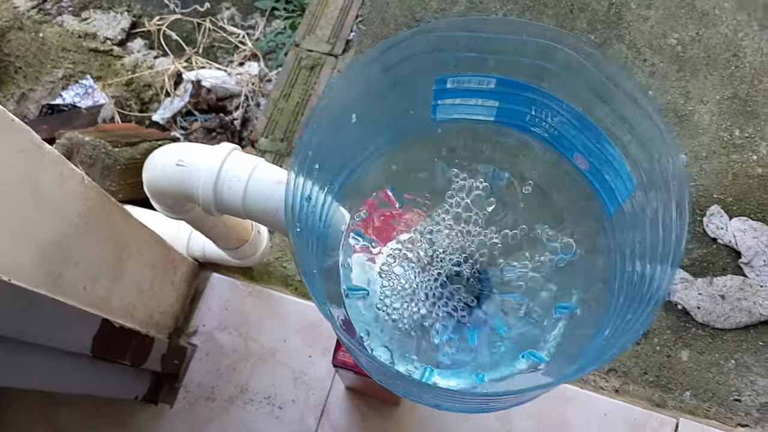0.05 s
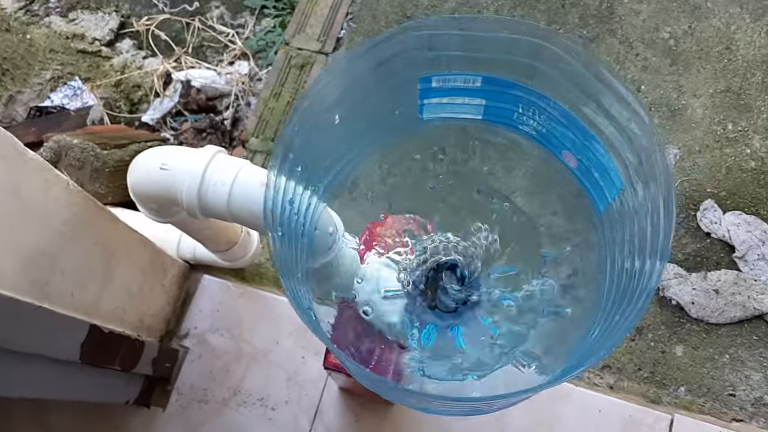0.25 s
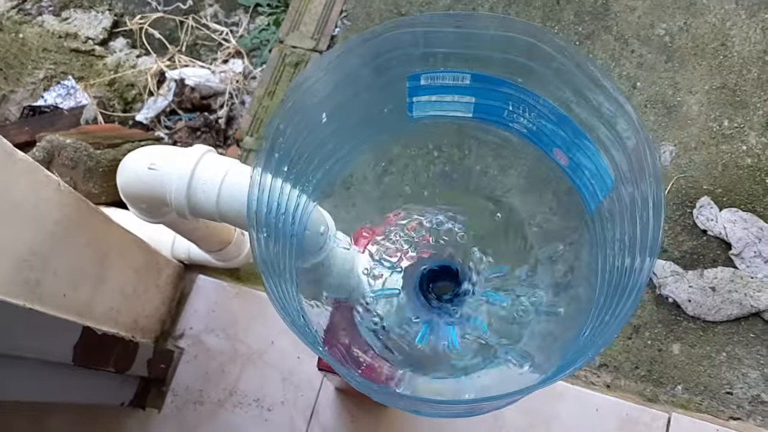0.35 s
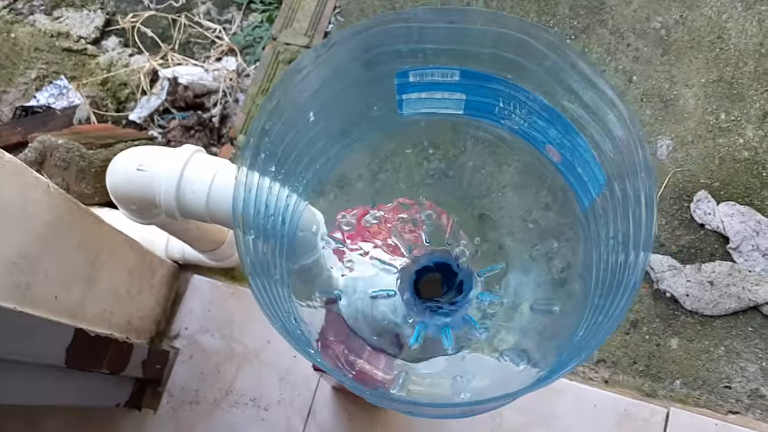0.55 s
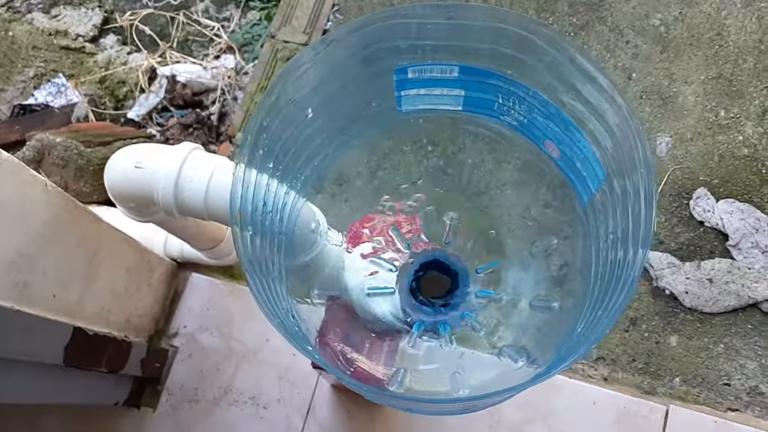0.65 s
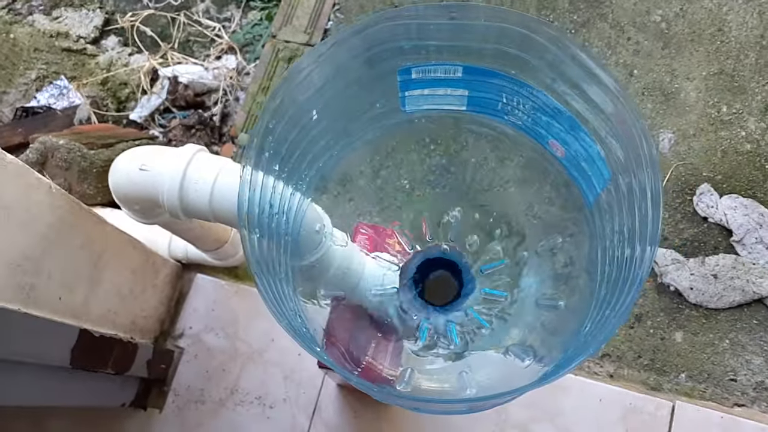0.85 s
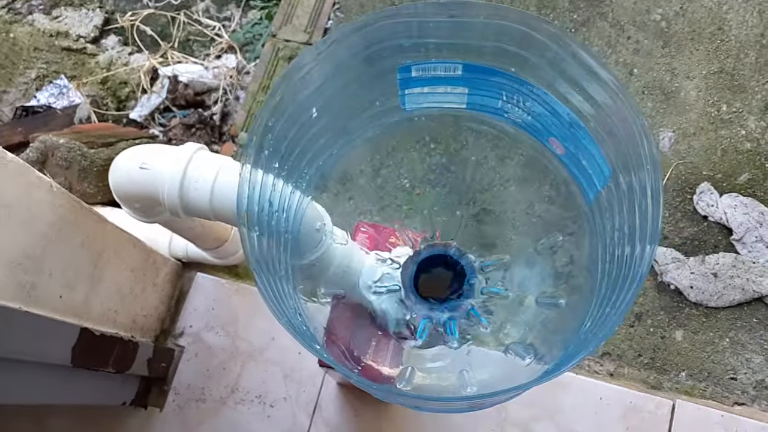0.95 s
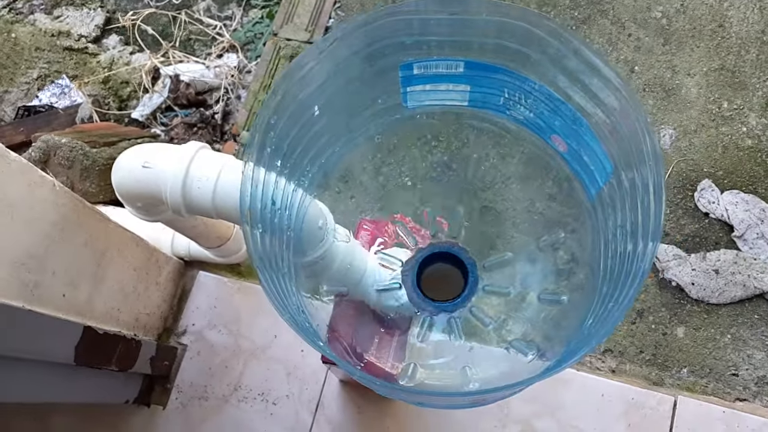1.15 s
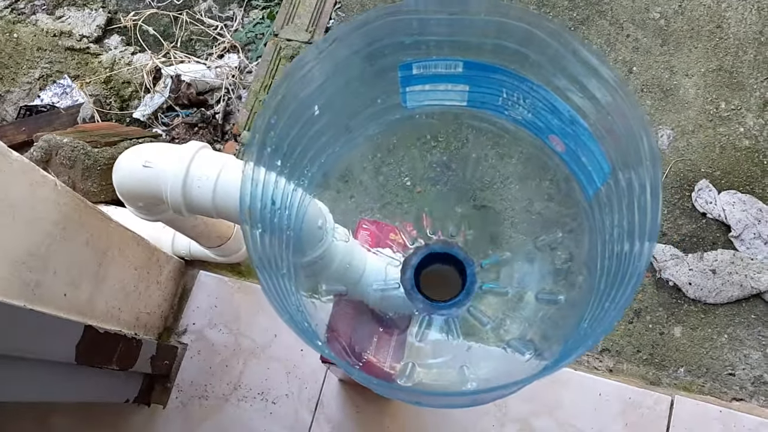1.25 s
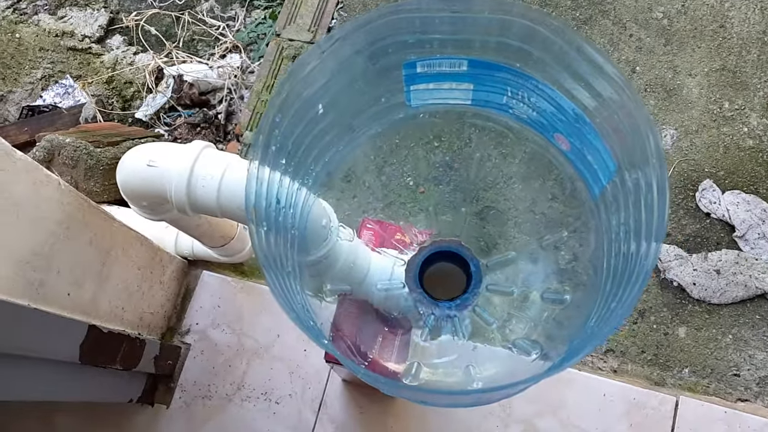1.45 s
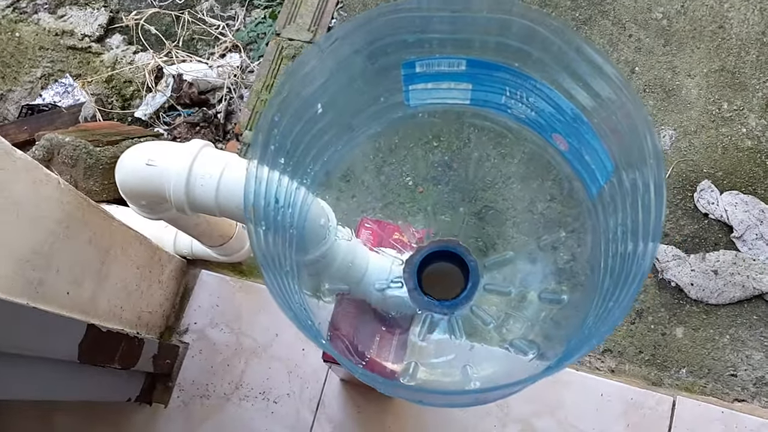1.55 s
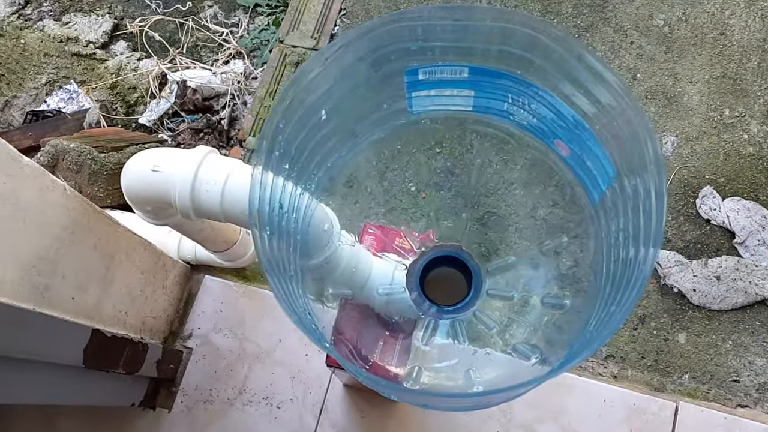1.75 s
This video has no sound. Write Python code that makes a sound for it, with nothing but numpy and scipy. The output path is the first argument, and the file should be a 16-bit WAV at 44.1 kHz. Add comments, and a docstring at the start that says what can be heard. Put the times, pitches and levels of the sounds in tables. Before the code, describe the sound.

Water drains from a plastic bowl into a pipe, close by, starting at about 0.2 seconds with a rising, sputtering slurp. From 0.3 seconds, quick hollow gulps and gurgles follow, mixed with fizzing bubbles and droplet ticks, strongest around 0.9 to 1.1 seconds. A last burst comes at 1.5 seconds, and the empty pipe rings briefly, fading into quiet outdoor air.

```python
"""Outdoors, at a drain pipe: the last water in a plastic bowl swirls down.
The vortex breaks through with a rising slurp. Gulps of air boom in the pipe's throat over a
brief hollow tone, while films burst in the neck and spray, bubbles and droplets fizz at the rim.
After the last plug of water bursts, the emptied pipe rings briefly over quiet outdoor air."""
import sys
import numpy as np
from scipy import signal
from scipy.fft import rfft, irfft
from scipy.io import wavfile
from scipy.ndimage import map_coordinates

SR = 44100
rng = np.random.default_rng(int(sys.argv[2]) if len(sys.argv) > 2 else 0)


def wrap_up_sound(samples):
    """Save the sound to the file named by the first command line argument, as 16-bit audio."""
    columns = np.atleast_2d(samples).T
    # keep every value between -1 and 1, then stretch to whole-number steps
    tamed = np.clip(columns, -1, 1)
    steps = np.round(tamed * 32767).astype(np.int16)
    wavfile.write(sys.argv[1], SR, steps)


N = 79380
TIME = np.arange(N) / SR

# air pockets in the throat: start_s, peak_db, pitch_hz, decay_s
AIR_POCKETS = [(.273, -10, 326, 0.005), (.291, -11.5, 302, 0.016), (.305, -11.5, 324, 0.0055),
               (.319, -14, 315, .0079), (.340, -17, 293, 0.0097), (.360, -13, 313.5, 0.015),
               (.407, -11.5, 221, 0.0062), (.469, -11, 299, 0.0074), (.493, -10.5, 264, 0.0034),
               (.526, -13, 302, 0.0067), (.626, -17.5, 245, 0.0037), (.653, -9.5, 240, 0.0084),
               (.668, -11.5, 314.7, 0.014), (.684, -10, 282.4, 0.011), (.700, -9, 294.4, 0.0068),
               (.728, -9.5, 319.5, 0.0091), (.762, -16, 341, 0.011), (.781, -13.5, 309, 0.014),
               (.804, -12.5, 295, 0.012), (.840, -16.5, 295, 0.0027), (.876, -11.5, 336, 0.0055),
               (.899, -7.5, 303, 0.0083), (.913, -5.5, 287, 0.0072), (.961, -9.5, 284, 0.0038),
               (.999, -13.5, 308, .009), (1.017, -11.5, 324.4, 0.011), (1.055, -5.5, 320.3, 0.013),
               (1.062, -7.5, 334, .009), (1.087, -15, 239, 0.01), (1.186, -11.5, 317, 0.0051),
               (1.201, -16, 342, .012), (1.214, -12.5, 316, 0.0055), (1.273, -16.5, 333, 0.0097),
               (1.286, -14.5, 335, 0.0077), (1.319, -14, 292.6, 0.0085), (1.481, -16.5, 302, 0.0066),
               (1.512, -8.5, 300, 0.0057)]
# films bursting in the neck: start_s, length_s, level_db, centre_hz, width_hz
FILM_BURSTS = [(.185, .022, -31, 1270, 500), (.211, .0035, -18.5, 1740, 1610),
               (.2167, .0051, -12, 2150, 1000), (.232, .01, -20.5, 990, 220),
               (.323, .012, -20.5, 3000, 1770), (.650, .008, -25, 1700, 5100),
               (.729, .009, -23.5, 850, 196), (.766, .008, -24.5, 950, 1100),
               (.804, .006, -30.5, 2500, 2000), (.892, .018, -21.5, 650, 400),
               (.899, .017, -15.5, 1110, 190), (1.015, .014, -23.5, 1010, 900),
               (1.044, .014, -18.5, 2120, 500), (1.052, .015, -20, 1620, 300), (1.056, .025, -22, 830, 400),
               (1.059, .01, -19, 2700, 275), (1.113, .011, -28.5, 2600, 900),
               (1.185, .036, -25.5, 800, 800), (1.210, .022, -22.5, 1600, 1300),
               (1.284, .0048, -18, 950, 298), (1.286, .0065, -23, 1800, 1200), (1.479, .01, -24, 630, 248),
               (1.493, .012, -20.5, 623, 159), (1.494, .017, -22.5, 1970, 1330),
               (1.511, .0034, -16, 790, 1390), (1.52, .0035, -15, 1470, 1570)]
# hollow neck: centre_hz, width_hz, gain_db
NECK_MODES = [(721, 45, 7), (931, 50, 6), (1660, 60, 4), (2800, 110, 7)]
# vortex suction: time_s, level_db, resonance_hz
SLURP_CURVE = [(.18, -58, 1300), (.205, -35, 1610), (.225, -27, 1810), (.27, -21.5, 1870),
               (.305, -21.5, 2130), (.335, -24, 2210), (.385, -38.5, 2230), (.56, -40.5, 2340),
               (.69, -36, 2220), (.84, -41.5, 2180), (1.05, -66, 2220)]
# vortex core: resonance_ratio, width_hz, gain_db
CORE_MODES = [(1.002, 167, 3.5), (1.48, 438, -7.5), (2.15, 690, -12)]
# water over the rim: time_s, spray_db, bubbling_db
RIM_FLOW = [(.185, -56.5, -62.5), (.224, -34.5, -35), (.33, -37.5, -33.5), (.42, -41.5, -37),
            (.56, -44.5, -37), (.66, -38.5, -33), (.80, -41.5, -38), (.90, -42.5, -33.5), (.985, -40, -39),
            (1.06, -42.5, -32.5), (1.14, -41.5, -37.5), (1.215, -39, -37), (1.27, -43.5, -36.5),
            (1.42, -46, -51.5), (1.465, -42.5, -40), (1.502, -32.5, -31), (1.545, -42, -34.5),
            (1.61, -54.5, -44.5), (1.8, -63.5, -58)]
# spray, bubbling and throat turbulence: freq_hz, gain_db
SPRAY_SPECTRUM = [(1500, -19), (2800, -5), (3800, -6), (5000, -1), (6600, 0), (7500, -10), (9500, -4.5),
                  (12000, -12), (16000, -20)]
BUBBLING_SPECTRUM = [(400, -12), (600, 0), (950, -2), (1200, -2.5), (1600, -2), (2750, 1.5), (3500, -14),
                     (7000, -39)]
CHURN_SPECTRUM = [(25, -51), (90, -13.5), (160, -7), (220, 1), (340, 5.5), (410, -5.5), (560, -17.5),
                  (1200, -39)]
# bubble clusters at the rim: start_s, peak_db, pitch_hz
BUBBLE_CLUSTERS = [(.196, -19, 1500), (.239, -18.5, 5050), (.272, -12.5, 3380), (.305, -11.5, 2880),
                   (.344, -14.5, 4500), (.358, -18.5, 4100), (.406, -18, 2280), (.447, -24, 2920),
                   (.4615, -14, 3130), (.742, -24, 5200), (.876, -23, 2900), (1.017, -23, 3600),
                   (1.113, -23.5, 6350), (1.182, -26, 6500)]
# droplets on plastic: start_s, peak_db
DROPLETS = [(.199, -31), (.2185, -21), (.253, -21), (.528, -23), (.652, -22.5), (.806, -24)]
# air column of the empty pipe: pitch_hz, gain_db, t60_s
PIPE_MODES = [(188.3, -6, 0.48), (274.4, 1, 0.38), (310, 4, 0.15), (359, -3.5, 0.41), (449.4, -5.5, 0.35),
              (667, 0.5, 0.17)]
# outdoor air: freq_hz, gain_db
AIR_SPECTRUM = [(25, -31), (60, 3.5), (350, -1.5), (550, -9.5), (1300, -20.5), (2700, -3), (5000, -8),
                (8000, -21), (15000, -28)]
# outdoor air: time_s, level_db
AIR_CURVE = [(0, -49), (1.8, -54)]
# stereo width: freq_hz, side_gain_db
SIDE_SPECTRUM = [(250, -18.5), (600, -12), (1200, -11), (2500, -12), (5000, -4.5), (9000, -3), (15000, 2)]
# stereo balance: freq_hz, left_minus_right_db
BALANCE = [(700, 0.5), (1400, 2), (2800, 2.5), (5500, 3.5), (9000, -0.3), (14000, -1.8)]
# the right channel falls slowly behind: time_s, right_lag_s
RIGHT_LAG = [(.3, 0), (.7, .000055)]

PIPE_EMPTY_S = 1.513


def gulps(rise_s=0.0015, glide_per_cycle=0.00596, round_trip_s=.0178, echo_db=-19, size=5000):
    """Air pockets ring in the throat, pitch rising slightly; the pipe's bend echoes them. Mono."""
    overtone_ratio, overtone_db = 3.02, -21
    out, t = np.zeros(N), TIME[:size]
    for start_s, peak_db, hz, decay_s in AIR_POCKETS:
        envelope = (1 - np.exp(-t / rise_s)) ** 2 * np.exp(-t / decay_s)
        phase = 2 * np.pi * hz * t * (1 + glide_per_cycle * hz * t / 2)
        tone = np.sin(phase) + from_db(overtone_db) * np.sin(overtone_ratio * phase)
        ring = from_db(peak_db) * envelope / envelope.max() * tone
        for trip in range(3):
            add(out, start_s + trip * round_trip_s, from_db(trip * echo_db) * ring)
    return signal.sosfilt(signal.butter(2, 110, "high", fs=SR, output="sos"), out)


def spits(rise_s=0.00068, hold_share=0.59, decay_s=0.0037, dull_hz=3050, splash_db=-19.5, size=2600):
    """Films tear in puffs of crackle, coloured by the gap and the neck, and throw bright spray."""
    out, t = np.zeros((2, N)), TIME[:size]
    tearing = crackle(per_s=6000, spread_db=2.5, hiss_db=-4)
    spray = rms_one(colour(tearing, SPRAY_SPECTRUM))
    for start_s, length_s, level_db, centre_hz, width_hz in FILM_BURSTS:
        span = slice(int(start_s * SR), int(start_s * SR) + size)
        hold_s = hold_share * length_s
        envelope = np.minimum(t / rise_s, 1) * np.exp(-np.maximum(t - hold_s, 0) / decay_s)
        gap = signal.lfilter(*resonance(centre_hz, width_hz), tearing[:, span] * envelope)
        neck = sum(from_db(db) * signal.lfilter(*resonance(hz, band_hz), gap)
                   for hz, band_hz, db in NECK_MODES)
        puff = lowpass(gap + neck, max(dull_hz, centre_hz + width_hz / 2), order=8)
        puff *= np.sqrt(hold_s * SR / np.sum(puff ** 2, axis=1, keepdims=True))
        splash = from_db(splash_db) * np.sqrt(width_hz / 1000) * spray[:, span] * envelope
        add(out, start_s, from_db(level_db) * (puff + splash))
    return out


def slurp():
    """Air sputters through the vortex core, whose resonances rise as it opens."""
    level_db, resonance_hz = in_time(SLURP_CURVE)
    sputter = crackle(per_s=1800, spread_db=2.2, hiss_db=-11.5)
    core = sum(from_db(gain_db) * sweep(sputter, ratio * resonance_hz, width_hz)
               for ratio, width_hz, gain_db in CORE_MODES)
    return from_db(level_db) * rms_one(lowpass(core, 6000, order=5))


def running_water(clump_hz=50, clump_db=2.5, churn_full_db=8, churn_empty_db=1):
    """Uneven spatters of spray, small bubbles and low churning at the drain's mouth."""
    spray_db, bubbling_db = in_time(RIM_FLOW)
    clumps = rms_one(lowpass(rng.standard_normal(2 * N), clump_hz, order=2)[N:])
    fizz = bubbles(2195, 14500, per_s=1100, t60_cycles=65, spread_db=3.5, hiss_db=-10.5)
    fizz += from_db(-1.5) * crackle(per_s=600, spread_db=2.6, hiss_db=-1)
    spray = rms_one(colour(fizz, SPRAY_SPECTRUM) * from_db(clump_db * clumps))
    bubbling = bubbles(474, 3170, per_s=800, t60_cycles=24, spread_db=3.5, hiss_db=0.5)
    bubbling = rms_one(throat(colour(bubbling, BUBBLING_SPECTRUM)))
    churn = rms_one(colour(rng.standard_normal((2, N)), CHURN_SPECTRUM))
    emptying_s = AIR_POCKETS[-3][0]
    churn_db = np.interp(TIME, [emptying_s, PIPE_EMPTY_S], [churn_full_db, churn_empty_db])
    return from_db(spray_db) * spray + from_db(bubbling_db) * (bubbling + from_db(churn_db) * churn)


def bubbles(low_hz, high_hz, per_s, t60_cycles, spread_db, hiss_db, size=700):
    """Small bubbles ring, each at its own pitch, over smooth hiss. Mid and side."""
    out, t = np.zeros((2, N)), TIME[:size]
    hiss = rng.standard_normal((2, N))
    for when, pitch, chance, place in rng.random((9000, 4))[:int(per_s * N / SR)]:
        cycles = low_hz * (high_hz / low_hz) ** pitch * t
        level_db = -spread_db * np.log(chance + 0.029)
        ring = from_db(level_db - 60 * cycles / t60_cycles) * np.sin(2 * np.pi * cycles)
        pan = np.array([[1], [np.sqrt(2) * np.cos(np.pi * place)]])
        add(out, when * N / SR, pan * ring)
    return rms_one(out) + from_db(hiss_db) * hiss


def crackle(per_s, spread_db, hiss_db):
    """Tiny collapses of uneven size over smooth hiss. Mid and side."""
    hits = rng.random(N) < per_s / SR
    sizes = from_db(spread_db * np.minimum(rng.exponential(1, N), 4))
    clicks = rms_one(hits * sizes * rng.standard_normal((2, N)))
    return rms_one(clicks + from_db(hiss_db) * rng.standard_normal((2, N)))


def throat(x, pitch_hz=312.9, reflection=0.3):
    """Quarter-wave tube: the open end reflects inverted, so odd multiples of the pitch ring."""
    round_trip = np.exp(-1j * np.pi * np.arange(N // 2 + 1) * SR / N / pitch_hz)
    return irfft(rfft(x) * np.sqrt(1 - reflection ** 2) / (1 + reflection * round_trip), N)


def pings(rise_s=.0005, decay_s=.0055, q=10, top_hz=6900, size=2600):
    """Like-sized bubbles pinch off in quick flurries, each ringing around one pitch."""
    out, t = np.zeros((2, N)), TIME[:size]
    envelope = (1 - np.exp(-t / rise_s)) * np.exp(-t / decay_s)
    for start_s, peak_db, hz in BUBBLE_CLUSTERS:
        flurry = rng.standard_normal((2, size)) * envelope
        ring = signal.lfilter(*resonance(hz, hz / q), flurry)
        add(out, start_s, from_db(peak_db) * peak_one(ring))
    return lowpass(out, top_hz, order=8)


def ticks(decay_s=.0028, size=900):
    """Droplets strike the plastic with crisp, bright ticks."""
    out, envelope = np.zeros((2, N)), np.exp(-TIME[:size] / decay_s)
    bright = colour(rng.standard_normal((2, N)), SPRAY_SPECTRUM)
    for start_s, peak_db in DROPLETS:
        i = int(start_s * SR)
        add(out, start_s, from_db(peak_db) * peak_one(bright[:, i:i + size] * envelope))
    return out


def empty_pipe(rise_s=0.0065, gain_db=-23.5):
    """The freed air column rings out. Mono."""
    t = np.maximum(TIME - PIPE_EMPTY_S, 0)
    modes = sum(from_db(db - 60 * t / t60_s) * np.sin(2 * np.pi * hz * t)
                for hz, db, t60_s in PIPE_MODES)
    return from_db(gain_db) * (1 - np.exp(-t / rise_s)) * modes


def throat_tone(peak_s=.71, swell_s=.11, level_db=-33, pitch_hz=900, sag_hz_per_s=520):
    """A hollow, slightly falling tone in the pipe's throat swells and fades under the gulps."""
    t = TIME - peak_s
    tone = sweep(rng.standard_normal((2, N)), pitch_hz - sag_hz_per_s * t, width_hz=70)
    return from_db(level_db) * np.exp(-(t / swell_s) ** 2) * rms_one(tone)


def walls(x, t60_s=0.35, gain_db=-13.5, predelay_s=.003):
    """Short, faint scatter from the bowl and the house wall."""
    tail = rng.standard_normal((2, N)) * from_db(-60 * TIME / t60_s) * (TIME > predelay_s)
    tail /= np.sqrt(np.sum(tail ** 2) / 2)
    return from_db(gain_db) * signal.fftconvolve(x, tail, axes=1)[:, :N]


def outdoor_air():
    """Quiet rumble and hiss, slowly fading."""
    level_db, = in_time(AIR_CURVE)
    return from_db(level_db) * rms_one(colour(rng.standard_normal((2, N)), AIR_SPECTRUM))


def from_db(db):
    """Decibels to gain."""
    return 10 ** (np.asarray(db) / 20)


def rms_one(x):
    """Scale to rms 1."""
    return x / np.sqrt(np.mean(x ** 2) + 1e-20)


def peak_one(x):
    """Scale each channel to peak 1."""
    return x / np.abs(x).max(axis=1, keepdims=True)


def add(out, start_s, sound):
    """Mix a short sound in at start_s."""
    i = int(np.clip(start_s * SR, 0, N - 1))
    out[..., i:i + sound.shape[-1]] += sound[..., :N - i]


def in_time(rows):
    """Each value column of a time curve at every sample."""
    time_s, *columns = np.transpose(rows)
    return [np.interp(TIME, time_s, column) for column in columns]


def over_hz(points):
    """A (freq_hz, value) table at every frequency bin."""
    hz, value = np.transpose(points)
    return np.interp(np.log(np.arange(N // 2 + 1) * SR / N + 1), np.log(hz), value)


def colour(x, points):
    """Filter by a (freq_hz, gain_db) table."""
    return irfft(rfft(x) * from_db(over_hz(points)), N)


def lowpass(x, hz, order):
    """Maximally flat low-pass."""
    return signal.sosfilt(signal.butter(order, hz, fs=SR, output="sos"), x)


def resonance(hz, width_hz):
    """Resonator coefficients, peak gain 1."""
    r = np.exp(-np.pi * width_hz / SR)
    return np.array([1, 0, -1]) * (1 - r * r) / 2, [1, -2 * r * np.cos(2 * np.pi * hz / SR), r * r]


def sweep(x, hz, width_hz, size=126):
    """Resonator with moving pitch, retuned every block."""
    out, state = np.zeros((2, N)), np.zeros((2, 2))
    for i in range(0, N, size):
        block = slice(i, i + size)
        out[:, block], state = signal.lfilter(*resonance(hz[i], width_hz), x[:, block], zi=state)
    return out


def scene():
    """The drain, slightly left and wider in the treble, over outdoor air."""
    air = outdoor_air()
    water = spits() + slurp() + throat_tone() + pings() + ticks() + running_water()
    water[0] += gulps() + empty_pipe()  # mid only
    mid, side = water + walls(water) + air
    side = colour(side, SIDE_SPECTRUM)
    lean = from_db(over_hz(BALANCE) / 2)
    left = irfft(rfft(mid + side) * lean, N)
    right = irfft(rfft(mid - side) / lean, N)
    lag_s, = in_time(RIGHT_LAG)
    return np.array([left, map_coordinates(right, [(TIME - lag_s) * SR], order=5, mode="nearest")])


def record(dry, cutoff_hz=15800):
    """Clip at full scale, then cut the top."""
    return signal.sosfilt(signal.ellip(10, .1, 80, cutoff_hz, fs=SR, output="sos"), np.clip(dry, -1, 1))


dry = scene()
out = record(dry)
wrap_up_sound(out)
```